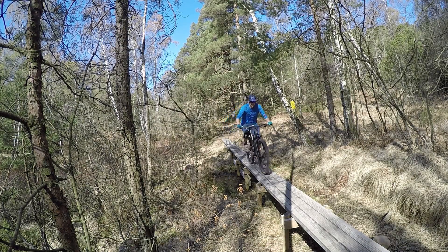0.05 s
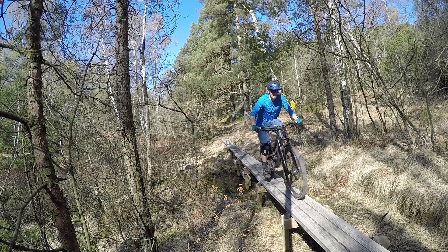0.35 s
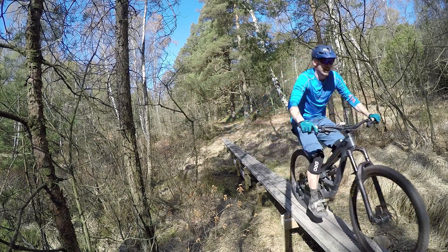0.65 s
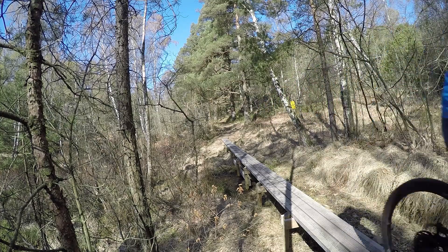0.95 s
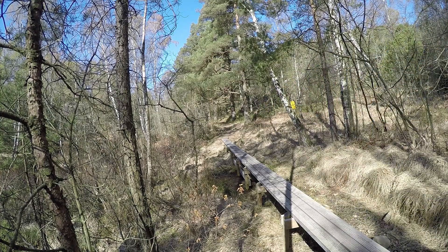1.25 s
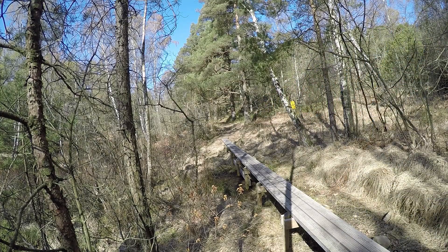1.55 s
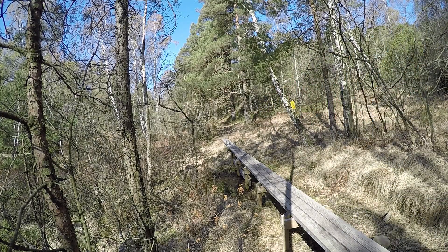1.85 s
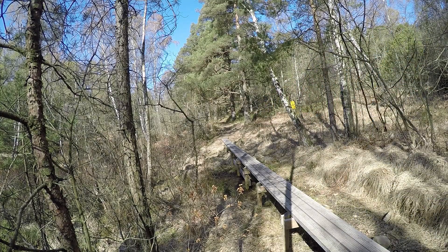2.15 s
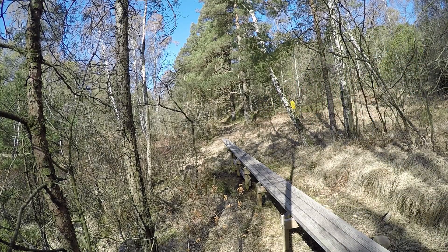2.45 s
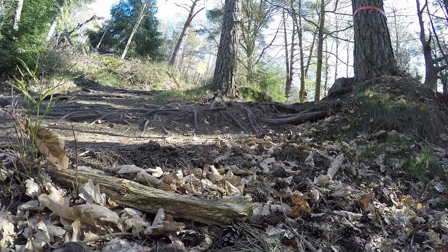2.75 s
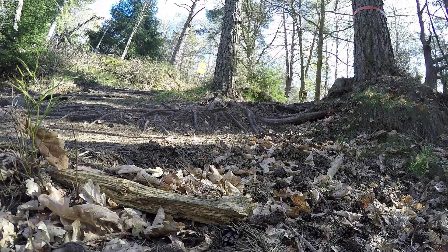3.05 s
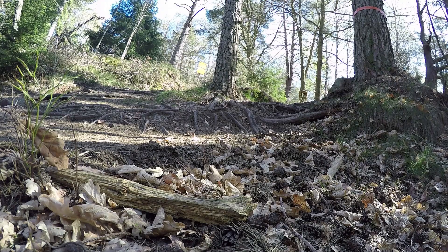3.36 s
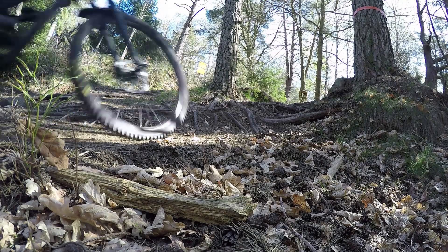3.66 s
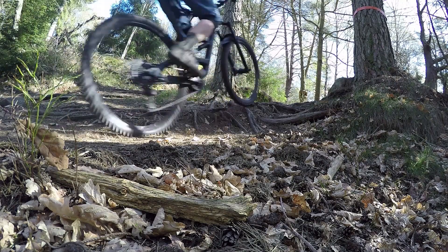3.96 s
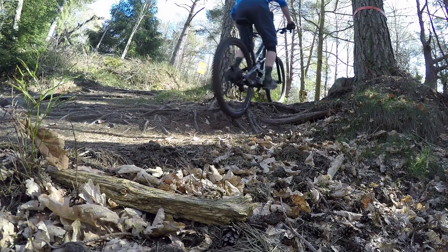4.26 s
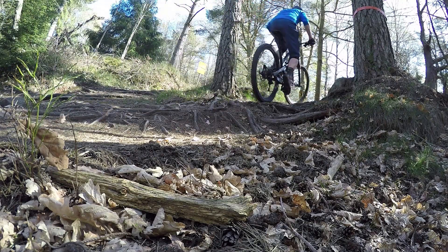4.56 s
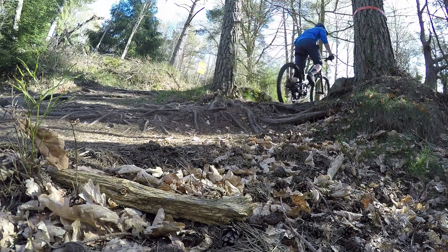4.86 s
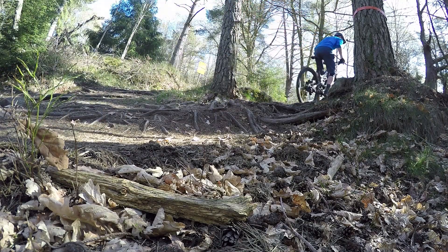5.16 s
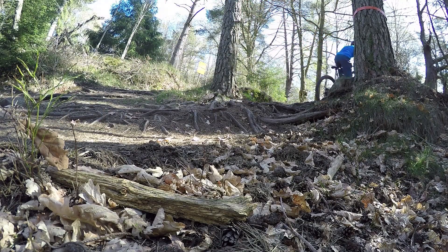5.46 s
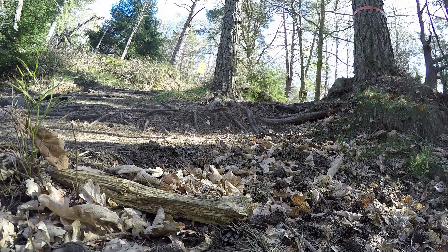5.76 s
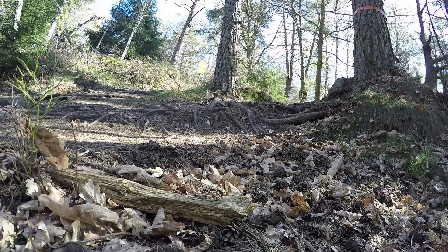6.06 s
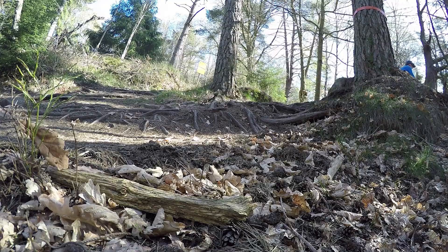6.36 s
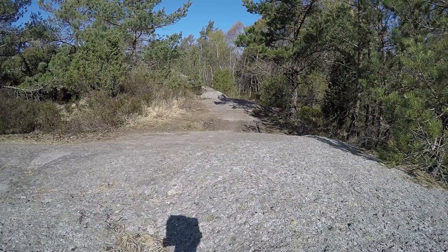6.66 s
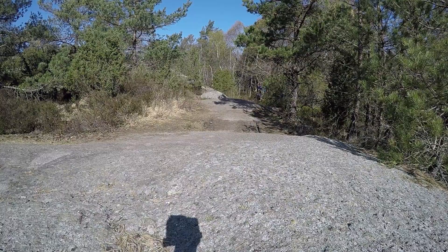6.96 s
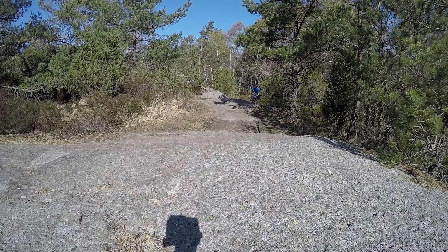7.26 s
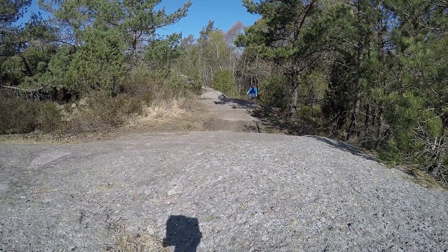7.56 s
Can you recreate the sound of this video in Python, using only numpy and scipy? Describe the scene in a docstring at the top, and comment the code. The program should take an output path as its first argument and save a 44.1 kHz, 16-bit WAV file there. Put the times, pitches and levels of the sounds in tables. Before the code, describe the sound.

Knobby bicycle tyres drum on planks and coast past buzzing, then bump over roots and dry leaves before a bird trill and gusting wind.

```python
"""A mountain bike in a forest, heard from three spots on the ground, one after the other. Its tyres drive the
resonances of a plank bridge, and it coasts past, the freehub's pawls exciting the rear wheel into a buzz. On a
trail it thumps over roots and crushes dry leaves, the chain ticking against the frame, and leaves a small bird
singing. Then, with a sharp pop as the scene changes, turbulent wind buffets the microphone on open rock."""
import sys
import numpy as np
from scipy import signal
from scipy.fft import rfft, irfft, next_fast_len
from scipy.io import wavfile
from scipy.ndimage import uniform_filter1d, map_coordinates

SR = 44100
rng = np.random.default_rng(int(sys.argv[2]) if len(sys.argv) > 2 else 0)


def store_pcm(level_fs):
    """Save levels as 16-bit WAV."""
    pcm = np.round(np.clip(level_fs, -1, 1) * 32767).astype(np.int16)
    wavfile.write(sys.argv[1], SR, np.atleast_2d(pcm).T)


N = 335601
T = np.arange(N) / SR

# Spectra of air in the treetops, from among the trees and from the rock: frequency_hz, gain_db
FOREST_SPECTRUM = [(290, -2), (500, -4), (628, -4), (694, -5.5), (949, -5), (1090, -5.5), (1320, -9),
                   (1800, -7), (2920, -7.5), (4670, -9.5), (5160, -8.5), (6860, -15), (13400, -18.5),
                   (15000, -21)]
ROCK_AIR_SPECTRUM = [(500, 4.5), (1100, 2.5), (1700, -1.5), (2400, 0), (2850, 1), (3500, -5), (5200, -5.5),
                     (7000, -10), (12500, -12.5), (15000, -23)]
# Bird notes: start_s, length_s, start_hz, middle_hz, end_hz, level_db
BIRD_NOTES = [(5.277, 0.15, 5150, 5080, 5050, -77), (5.43, 0.116, 5180, 5100, 5030, -69),
              (5.55, 0.12, 5090, 5140, 5050, -71), (5.675, 0.022, 5150, 5130, 5040, -62),
              (5.708, 0.093, 5130, 5130, 5030, -71), (6.364, 0.023, 3430, 3940, 4000, -58),
              (6.388, 0.025, 3640, 3000, 2650, -53.5), (6.455, 0.021, 4630, 4760, 4900, -60),
              (6.478, 0.024, 4760, 4100, 3800, -57), (6.503, .022, 3270, 3720, 3950, -56.5),
              (6.52, .03, 3670, 2980, 2500, -54.5)]
# Gusts on the microphone: centre_s, width_s, buffet_db, flutter_db
GUSTS = [(6.586, 0.022, -36.5, -40), (6.653, 0.028, -38, -46.5), (6.865, 0.019, -52, -44.5),
         (6.959, 0.036, -38, -43), (7.01, 0.029, -31, -37), (7.074, 0.014, -28, -46),
         (7.2, 0.069, -39, -41), (7.386, 0.083, -38.5, -42), (7.503, 0.081, -33.5, -41.5),
         (7.578, 0.05, -35, -38)]
# Spectra of large and of small eddies: frequency_hz, gain_db
BUFFET_SPECTRUM = [(12, -2), (25, 5), (42, 8.5), (65, 0), (100, -5.5), (160, -15), (300, -59)]
FLUTTER_SPECTRUM = [(90, -2.5), (160, 2.5), (250, 1.5), (400, 1), (490, -5), (620, -17), (850, -28),
                    (1300, -39), (2900, -50), (6000, -64)]
# Single eddies slapping the housing: start_s, peak_db
EDDY_SLAPS = [(6.987, -36), (7.063, -28.5), (7.205, -33)]

# Spectra of shaken soil, tyre casing and crushed leaves: frequency_hz, gain_db
SOIL_SPECTRUM = [(15, -16), (30, 10), (52, 8), (75, 5.5), (120, 0), (200, -10), (400, -60)]
CASING_SPECTRUM = [(90, -3), (190, 3), (280, -1), (400, -1), (520, -10.5), (700, -26), (1200, -40)]
LEAF_SPECTRUM = [(350, 0.5), (650, 1.5), (1200, 1), (1700, -1), (2800, 2), (3500, -6.5), (4800, -4.5),
                 (6500, -17.5), (9000, -22), (15000, -23.5)]
# Deep leaves under the wheels: centre_s, width_s, level_db
LEAF_PILES = [(3.8, 0.17, -57.5), (4.145, 0.023, -64), (4.335, 0.043, -57)]
# Wheels hitting roots: start_s, level_db, knock_relative_db, boom_hz, knock_hz
ROOT_IMPACTS = [(2.594, -44, 7.5, 105, 347), (2.659, -29.5, -13.5, 46, 362), (2.86, -38.5, 1, 71, 209),
                (2.974, -35.5, 2, 76.5, 289), (3.164, -30, -5.5, 69, 204), (3.282, -33, -22, 64.6, 202),
                (3.374, -30.5, -10.5, 58, 212), (3.609, -23.5, -8, 39, 232), (3.69, -28, -3, 50.5, 351),
                (3.802, -24.5, -3.5, 60, 227), (3.833, -27, -2.5, 51.7, 392),
                (3.867, -18.5, -4, 47.7, 225.6), (3.893, -24, -4, 59.5, 381), (3.918, -22, -7.5, 63.6, 233),
                (4.091, -14.5, -25, 48.5, 212), (4.148, -18, -18, 51.5, 202), (4.266, -17.5, -6, 56.5, 320),
                (4.353, -24, -3, 71.5, 200), (4.444, -28.5, -3, 76.4, 199),
                (4.932, -28.5, -4.5, 127.6, 316), (4.972, -32.5, -7, 84.4, 205), (5.356, -41, -25, 63, 205),
                (5.571, -38.5, -11.5, 71, 200), (5.865, -34.5, -16.5, 60.4, 299)]
# Resonances of tyre and frame under a blow: frequency_hz, width_hz, gain_db
KNOCK_MODES = [(129, 15.4, -8), (208, 60, 2.5), (322, 72, 7.5), (413, 48, 4), (485, 145, -8)]
# Twigs and leaves breaking: start_s, peak_db, clack_relative_db, clack_hz
TWIG_SNAPS = [(2.644, -46, 2, 2070), (2.977, -46, -12, 1620), (3.606, -35, 1.5, 2620),
              (3.805, -34, -7, 855), (3.919, -31, -5, 960), (4.028, -33.5, -3, 1060),
              (4.063, -35.5, -4, 1000), (4.141, -33, -10, 850), (4.265, -28.5, -1, 2820),
              (4.275, -38, -1, 2820), (4.351, -38, -8, 2090), (4.43, -41.5, 11.5, 1020),
              (4.447, -42, 3, 744), (4.463, -33.5, -2.5, 1040), (4.517, -38, -11, 1940),
              (4.756, -39, -11, 2970), (4.838, -37.5, -4.5, 1980), (4.934, -37, -5, 2020),
              (5.069, -43, -14, 969), (5.135, -45, -3, 2030), (5.238, -51, 1, 2500)]
# Spectrum of a snap: frequency_hz, gain_db
SNAP_SPECTRUM = [(300, 24), (700, 3), (1200, 6), (1700, 3), (2200, 5), (3000, -1), (4000, -23), (6500, -14),
                 (15000, -54)]
# Chain striking the frame: start_s, level_db, top_ring_relative_db
CHAIN_TICKS = [(0.1133, -41, -14), (0.5566, -34.5, -15), (0.7734, -38, -12), (2.6457, -38.5, -12),
               (2.718, -47, -19), (2.8, -44, -27), (2.9796, -46, -24), (3.059, -38.5, -23),
               (3.0777, -38.5, -28), (3.1885, -43.5, -26), (3.277, -40.5, -25), (3.4163, -38.5, -30),
               (3.773, -38, -11), (3.79, -36.5, -18), (3.9176, -35, -26), (4.0017, -34.5, -26),
               (4.0216, -32.5, -29), (4.2288, -48, -22), (4.2582, -38.5, -16), (4.6917, -47, -23),
               (4.757, -49, -7), (4.822, -44, -9), (4.9857, -47, -11), (5.093, -49, -9)]
# Resonances of the chain and of the planks: frequency_hz, width_hz, gain_db
CHAIN_MODES = [(3210, 630, 9), (3790, 280, -2), (4820, 1200, 4.5), (5330, 230, 1), (7720, 570, 3),
               (9660, 1500, -6.5)]
PLANK_MODES = [(210, 65, -4.5), (307.5, 60, -3), (384, 35, -5.5), (449, 73, -1.5)]
# Tyre knobs striking the wood: time_s, rate_hz
KNOB_RATE = [(0, 213), (.5, 250), (.85, 233), (1.3, 255), (1.9, 212), (2.55, 193)]
# Spectrum of tread on wood: frequency_hz, gain_db
TREAD_SPECTRUM = [(250, -44), (560, 5.5), (750, 2.5), (1080, 4), (1400, -1.5), (2000, 0), (2900, -3),
                  (3700, -16), (5400, -16.5), (7000, -26), (11000, -36), (15500, -35)]
# Loose planks drumming, and the span bending under the rider: centre_s, width_s, level_db
LOOSE_PLANKS = [(0.15, 0.051, -43.5), (0.285, 0.029, -48), (0.58, 0.043, -40), (0.72, 0.03, -41),
                (0.8, 0.047, -39), (0.95, 0.091, -43), (1.63, 0.088, -42.5), (1.86, 0.09, -42.5)]
SPAN_SWAYS = [(0.5, 0.12, -46), (0.68, 0.12, -40), (1.14, 0.19, -34.5), (1.36, 0.14, -39),
              (1.6, 0.13, -39.5), (1.87, 0.06, -50.5)]
# Pawl clicks while coasting: time_s, rate_hz
PAWL_RATE = [(.845, 68), (.9, 89), (.98, 98), (1.06, 116), (1.2, 139), (1.45, 125), (1.85, 134), (2.1, 123),
             (2.55, 119)]
# Resonances of the rear wheel's rim, spokes and hub shell: frequency_hz, width_hz, gain_db
RIM_MODES = [(1885, 540, -2), (2510, 490, -4.5), (2504, 47, 1.5), (2890, 405, 1.5)]
SPOKE_MODES = [(3950, 410, -1.5), (4550, 160, 2.5), (5320, 620, 3), (6200, 630, -1)]
SHELL_MODES = [(7960, 800, -7), (8520, 160, -7.5), (10060, 680, -4), (11480, 730, -6.5), (13160, 360, 2),
               (13930, 780, -2), (15300, 340, -2)]

TRAIL_START_S, ROCK_START_S = 2.563, 6.5646
BIKE_SPEED_M_S, SOUND_SPEED_M_S = 5.35, 343
# Closest approach of the tyres on the bridge, the rear hub and the tyres on the trail: time_s, gap_m
BRIDGE_PASS, HUB_PASS, TRAIL_PASS = (0.94, 1.74), (1.318, 0.93), (3.78, 1.53)


def amp(db):
    """Amplitude ratio: a factor of ten for every 20 dB."""
    return 10 ** (np.asarray(db) / 20)


def unit(x):
    """Normalisation to rms 1."""
    return x / np.sqrt(np.mean(x ** 2) + 1e-18)


def peak(x, db):
    """Normalisation to a peak level."""
    return x * amp(db) / np.abs(x).max()


def add(out, start_s, x):
    """Superposition: x joins the mix at start_s."""
    i = max(int(start_s * SR), 0)
    out[i:i + len(x)] += x[:N - i]


def curve(table):
    """Linear interpolation of (time_s, value) rows."""
    return np.interp(T, *np.transpose(table))


def ramp(start_s, length_s):
    """Linear rise from 0 to 1."""
    return np.clip((T - start_s) / length_s, 0, 1)


def fade(t, t60):
    """Exponential decay by 60 dB in t60 seconds."""
    return np.exp(-np.log(1000) * t / max(t60, 1e-3))


def swells(rows, steady=0):
    """Incoherent addition: Gaussian swells and a steady gain sum in power."""
    power = sum(amp(db) ** 2 * .5 ** np.minimum((2 * (T - centre_s) / width_s) ** 2, 100)
                for centre_s, width_s, db in rows)
    return np.sqrt(steady ** 2 + power)


def filtered(x, response):
    """Linear filtering: the spectrum of x is multiplied by a frequency response."""
    size = next_fast_len(len(x) + 4096)
    hz = np.maximum(np.fft.rfftfreq(size, 1 / SR), 1)
    return irfft(rfft(x, size) * response(hz), size)[:len(x)]


def colour(x, spectrum):
    """Spectral shaping, falling 12 dB per octave beyond both ends; rms 1."""
    hz, db = np.transpose(spectrum)
    def response(f):
        skirts = (np.minimum(f / hz[0], 1) * np.minimum(hz[-1] / f, 1)) ** 2
        return skirts * amp(np.interp(np.log(f), np.log(hz), db))
    return unit(filtered(x, response))


def ring(x, modes):
    """Forced resonance: x drives modes with steep skirts; rms 1."""
    def response(f):
        return sum((-1j) ** k * amp(db) / (1 + 1j * (f * f - hz * hz) / (2 * width * f)) ** 2
                   for k, (hz, width, db) in enumerate(modes))
    return unit(filtered(x, response))


def wander(rate_hz):
    """Random modulation: values held and smoothed; rms 1."""
    hold = max(int(SR / rate_hz), 1)
    steps = np.repeat(rng.standard_normal(N // hold + 1), hold)
    return unit(uniform_filter1d(steps, hold)[:N])


def grains(rate_hz, spread_db):
    """Shot noise: tiny impacts at random moments, a few much bigger than the rest."""
    impulses = (rng.random(N) < rate_hz / SR) * rng.choice([-1, 1], N)
    return impulses * amp(spread_db * np.minimum(rng.exponential(size=N), 4))


def burst(t60):
    """Damped noise, 0.2 s long, as from a rough contact."""
    t = T[:SR // 5]
    return rng.standard_normal(len(t)) * fade(t, t60)


def crack(t60):
    """Two-stage decay: a hard first contact, then a weaker rattle."""
    return burst(t60=0.0062) + amp(-7.5) * burst(t60)


def distance(closest_s, gap_m):
    """Uniform straight motion: the bike's distance as a multiple of its closest approach."""
    return np.hypot(1, BIKE_SPEED_M_S * (T - closest_s) / gap_m)


def spreading(far, near_db, loss_db):
    """Spreading loss: the gain falls by loss_db with each doubling of distance."""
    return amp(near_db - loss_db * np.log2(far))


def fly_by(x, closest_s, gap_m, image_offset_m=0.9, image_db=-19.5):
    """Doppler effect: changing travel time bends the pitch; ground-echo interference sweeps the colour."""
    def delayed(path_m):
        emitted_s = T - (path_m - gap_m) / SOUND_SPEED_M_S
        return map_coordinates(x, [emitted_s * SR], order=5, mode="nearest")
    direct_m = gap_m * distance(closest_s, gap_m)
    return delayed(direct_m) + amp(image_db) * delayed(np.hypot(direct_m, image_offset_m))


def forest(on_rock):
    """Flow noise: faint air in the treetops, with another spectrum out on the rock."""
    among_trees = colour(rng.standard_normal(N), FOREST_SPECTRUM) * amp(-65)
    in_the_open = colour(rng.standard_normal(N), ROCK_AIR_SPECTRUM) * amp(-63)
    return np.where(on_rock, in_the_open, among_trees) * amp(0.45 * wander(2.77))


def bird(trill_start_s=5.821, trill_step_s=0.0652):
    """Frequency modulation: whistles, a trill and two flourishes, smeared by reverberation in trees."""
    out = np.zeros(N)
    # one falling note, repeated evenly and growing louder
    trill = [(trill_start_s + k * trill_step_s, 0.027, 5200, 3900, 2850, -60 - 8 * 0.5 ** k)
             for k in range(9)]
    for start_s, length_s, *glide_hz, db in BIRD_NOTES + trill:
        progress = np.linspace(0, 1, int(length_s * SR))
        phase = 2 * np.pi * np.cumsum(np.interp(progress, [0, .5, 1], glide_hz)) / SR
        detune = 1 + 0.016 * rng.standard_normal() * (length_s < .03)  # quick notes vary in pitch
        add(out, start_s, np.sin(phase * detune) * np.sin(np.pi * progress) * amp(db))
    trees = burst(t60=0.74)
    reverberation = signal.fftconvolve(out, trees / np.linalg.norm(trees))[:N]
    return amp(-1) * (out * amp(2.2 * wander(120)) + reverberation)


def wind(slap_cutoff_hz=550):
    """Turbulence: large eddies buffet the microphone, small ones flutter round its housing."""
    buffet_gain = swells([(s, width, db) for s, width, db, _ in GUSTS], steady=amp(-44))
    flutter_gain = swells([(s, width, db) for s, width, _, db in GUSTS], steady=amp(-51))
    buffet = colour(rng.standard_normal(N), BUFFET_SPECTRUM) * buffet_gain
    flutter = colour(rng.standard_normal(N), FLUTTER_SPECTRUM) * flutter_gain * amp(2.4 * wander(55))
    lowpass = signal.butter(6, slap_cutoff_hz, fs=SR, output="sos")
    for start_s, db in EDDY_SLAPS:
        add(flutter, start_s, peak(signal.sosfilt(lowpass, burst(t60=0.04)), db))
    return buffet + flutter


def pop():
    """Heavily damped oscillation: a sharp pop at the scene change swings back once and dies."""
    out, t = np.zeros(N), T[:SR // 50]
    add(out, ROCK_START_S, amp(-13) * np.cos(2 * np.pi * 330 * t + .5) * fade(t, t60=0.0065))
    return out


def trail():
    """Rolling noise: tyres shake the soil, drone in their casings and crush dry leaves."""
    far = distance(*TRAIL_PASS)
    root_bed = amp(5 * (ramp(3.6, 0.025) - ramp(4.48, 0.025)))  # rough ground is louder
    shadow = amp(-9 * ramp(4.03, 1.78))  # the bike sinks behind a rise; only the rumble is spared
    rumble_gain = np.hypot(spreading(far, -37.5, 6.33), amp(-64))
    rumble = colour(rng.standard_normal(N), SOIL_SPECTRUM) * rumble_gain
    drone = colour(grains(rate_hz=600, spread_db=4.5), CASING_SPECTRUM) * spreading(far, -46.5, 3.6)
    leaf_gain = spreading(far, -59, 3.7)
    uneven_cover = swells(LEAF_PILES, leaf_gain) * amp(2 * wander(70))
    leaves = colour(grains(rate_hz=1500, spread_db=1.5), LEAF_SPECTRUM) * uneven_cover
    brittle_leaves = colour(grains(rate_hz=55, spread_db=2), LEAF_SPECTRUM) * leaf_gain * amp(-6.5)
    return root_bed * (rumble + shadow * (drone + leaves + brittle_leaves))


def twigs():
    """Brittle fracture: twigs and leaves snap under the tread with a crack and a pitched clack."""
    out, t = np.zeros(N), T[:SR // 2]
    for start_s, db, clack_db, clack_hz in TWIG_SNAPS:
        snap = colour(crack(t60=0.099), SNAP_SPECTRUM)
        clack = np.sin(2 * np.pi * clack_hz * t) * fade(t, t60=0.0097)
        add(out, start_s, peak(snap, db))
        add(out, start_s, peak(clack, db + clack_db))
    return out


def roots(heavy_db=-21.5):
    """Impact excitation: each root sets off a soft boom in tyre and soil and a knock in the frame."""
    out, t = np.zeros(N), T[:SR // 2]
    for start_s, db, knock_db, boom_hz, knock_hz in ROOT_IMPACTS:
        boom_t60 = 0.17 + 0.03 * max(db - heavy_db, 0)  # heavy blows ring longer
        boom = np.sin(2 * np.pi * boom_hz * t) * (1 - fade(t, t60=0.053)) * fade(t, boom_t60)
        knock = np.sin(2 * np.pi * knock_hz * t) * (1 - fade(t, t60=0.028)) * fade(t, t60=0.099)
        scrub = ring(burst(t60=0.042), KNOCK_MODES)  # the tyre drags over the bark
        add(out, start_s, peak(boom, db - 4.5) + peak(knock, db + knock_db - 5.5))
        add(out, start_s, peak(scrub, db + knock_db - 3.5))
    return out


def chain():
    """Modal ringing: steel links slap the frame, giving a short clack and a thin ring on top."""
    out = np.zeros(N)
    for start_s, db, top_db in CHAIN_TICKS:
        contact = crack(t60=0.059)
        clack = ring(contact, CHAIN_MODES)
        top_ring = ring(contact, [(11300, 4700, -10), (14400, 520, -6)])
        add(out, start_s, peak(clack, db + 1.5) + peak(top_ring, db + top_db + 7))
    return out


def bridge():
    """Forced vibration: tyre knobs drum on planks and hiss as they peel off; the span sways and twists."""
    far = distance(*BRIDGE_PASS)
    knob_hz = curve(KNOB_RATE) * (1 + 0.0316 * wander(25))
    knob_phase = 2 * np.pi * np.cumsum(knob_hz) / SR
    hum = np.sin(knob_phase) * amp(-9.5 + 2.8 * wander(13))
    hum += np.sin(2 * knob_phase) * amp(-7 + 3.8 * wander(14))  # staggered rows sound the octave
    planks = ring(grains(rate_hz=900, spread_db=2), PLANK_MODES) * amp(-2)
    drone = (planks + hum) * swells(LOOSE_PLANKS, spreading(far, -39.5, 2.73))
    scuffing = swells(LOOSE_PLANKS) * amp(-7)  # a loose plank also scuffs the tread
    hiss = colour(grains(rate_hz=12000, spread_db=2.5), TREAD_SPECTRUM)
    hiss *= np.hypot(spreading(far, -39, 8.3), scuffing) * amp(wander(70))
    sway_hz = 49 + 3 * wander(21.004)
    sway = np.sin(2 * np.pi * np.cumsum(sway_hz) / SR) * amp(wander(19)) * swells(SPAN_SWAYS)
    twist = ring(rng.standard_normal(N), [(104, 43, 1), (159, 65, -7.5)]) * spreading(far, -45, 9.5)
    ground = colour(rng.standard_normal(N), SOIL_SPECTRUM) * amp(-55)
    return drone + hiss + sway + twist + ground


def freehub(pawl_lag_s=0.0012, far_coast_s=6.0):
    """Periodic impacts: pawls drop off tooth after tooth and ring the wheel; near and far buzz."""
    click_hz = curve(PAWL_RATE)
    coast_s = PAWL_RATE[0][0]
    coasting = T > coast_s
    teeth_passed = np.cumsum(click_hz * (1 + 0.0036 * wander(60)) * coasting) / SR
    click_size = amp(0.5 * rng.standard_normal(N))[teeth_passed.astype(int)]
    since_click_s = teeth_passed % 1 / click_hz
    first_pawl = fade(since_click_s, t60=.02)
    second_pawl = .6 * (since_click_s > pawl_lag_s) * fade(since_click_s - pawl_lag_s, t60=.014)
    strikes = click_size * (first_pawl + second_pawl)
    steel = rng.standard_normal(N) * coasting
    clicks = (strikes + .27) * steel  # scattering off the trees fills the gaps
    wheel = (strikes + .78) * steel  # the big parts ring on between clicks
    rim, spokes, shell = ring(wheel, RIM_MODES), ring(wheel, SPOKE_MODES), ring(clicks, SHELL_MODES)
    far = distance(*HUB_PASS)
    directivity = amp(-11.5 * far ** -4)  # the spokes are weakest side-on
    shadow = amp(-1.5 * (1 - ramp(coast_s, 0.52)))  # frame and rider hide the shell on the approach
    force = amp(5.5 * np.log2(click_hz / click_hz[-1]))  # faster pawls strike harder
    near_buzz = (rim * spreading(far, -38.5, 5.63)
                 + spokes * spreading(far, -38.5, 7.5) * directivity
                 + shell * spreading(far, -34, 6.38) * shadow)
    far_buzz = (shell * amp(-71) + rim * amp(-72.5)) * ramp(far_coast_s, 0.19)  # far down the trail
    return fly_by(near_buzz * force, *HUB_PASS), far_buzz


def scene():
    """Superposition of the sources at each spot; bridge, trail and rock follow each other abruptly."""
    on_bridge, on_rock = T < TRAIL_START_S, T >= ROCK_START_S
    on_trail = ~on_bridge & ~on_rock
    near_hub, far_hub = freehub()
    out = on_bridge * (bridge() + near_hub)
    out += on_trail * (trail() + roots() + twigs() + bird() + far_hub)
    out += on_rock * wind()
    return (out + chain() + pop() + forest(on_rock))[None]


def record(dry):
    """Elliptic low-pass filtering cuts the top of the treble steeply."""
    cutoff_hz = 15300
    return signal.sosfilt(signal.ellip(10, .2, 70, cutoff_hz, fs=SR, output="sos"), dry)


dry = scene()
out = record(dry)
store_pcm(out)
```